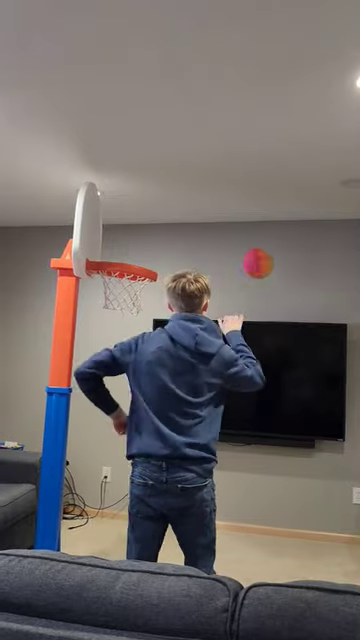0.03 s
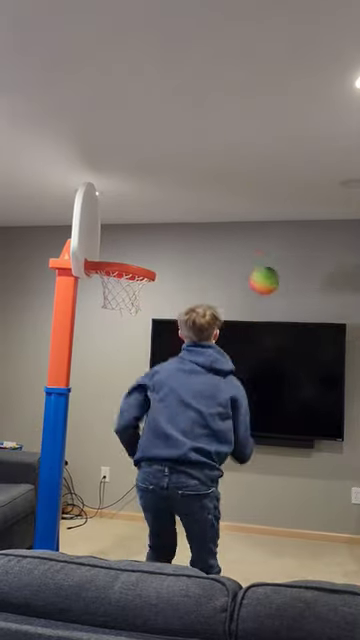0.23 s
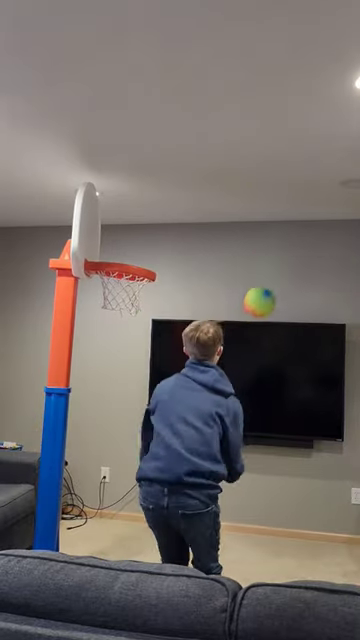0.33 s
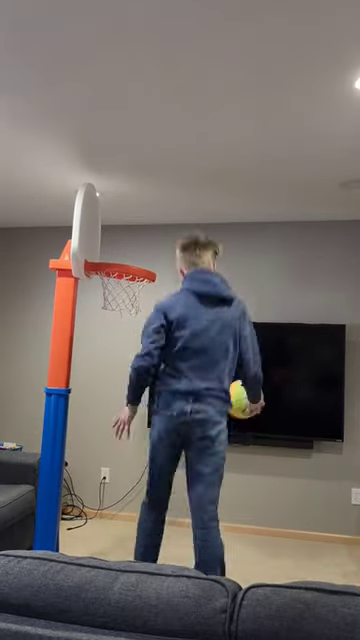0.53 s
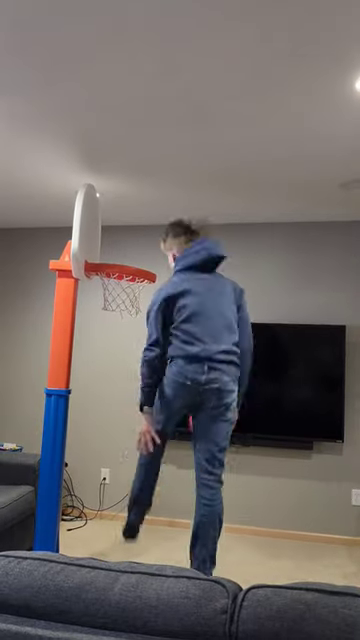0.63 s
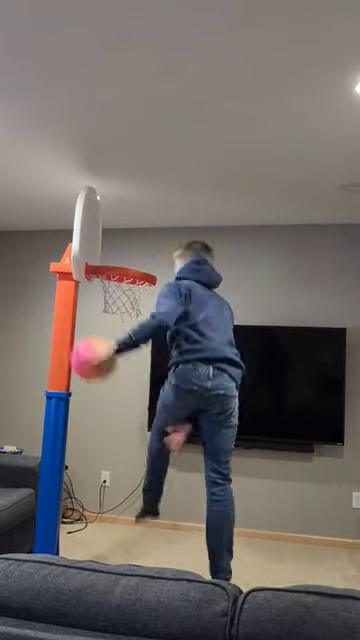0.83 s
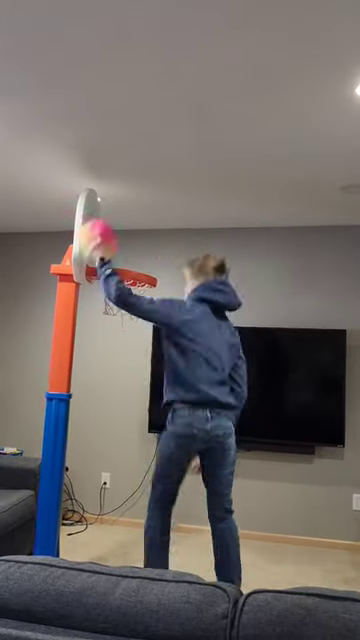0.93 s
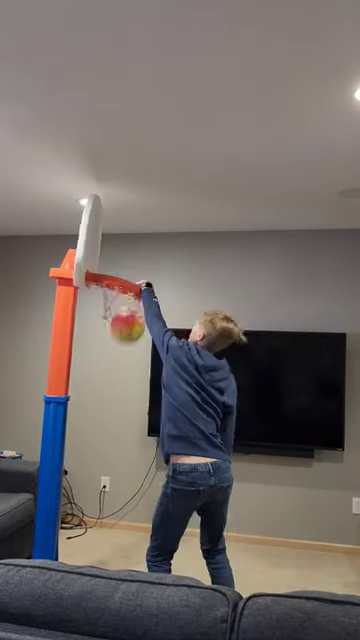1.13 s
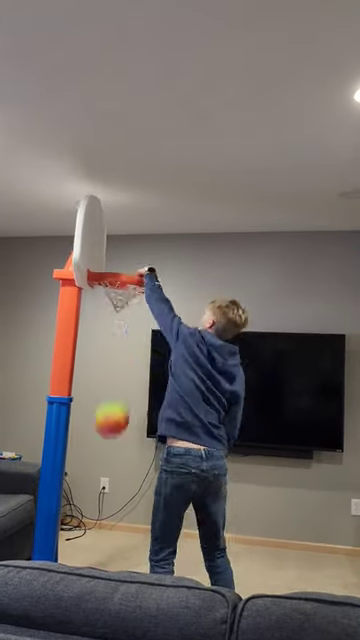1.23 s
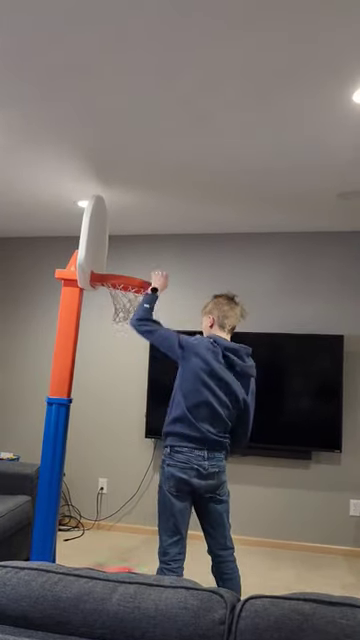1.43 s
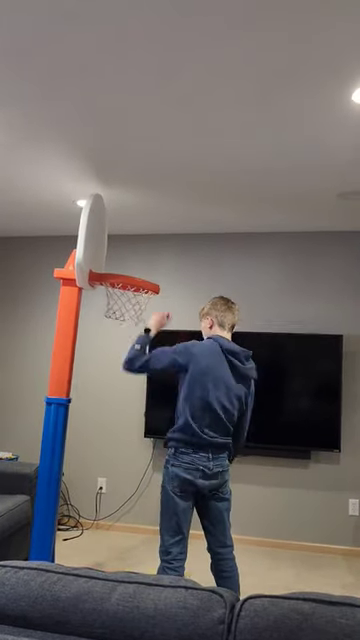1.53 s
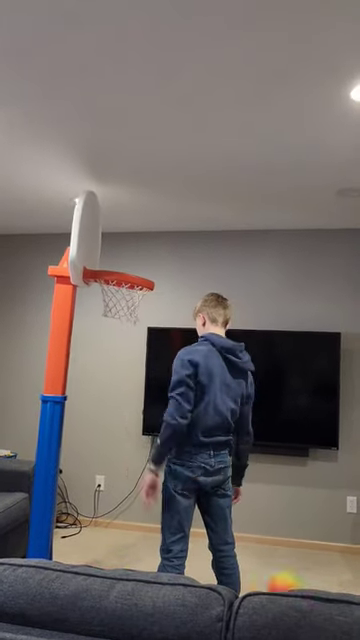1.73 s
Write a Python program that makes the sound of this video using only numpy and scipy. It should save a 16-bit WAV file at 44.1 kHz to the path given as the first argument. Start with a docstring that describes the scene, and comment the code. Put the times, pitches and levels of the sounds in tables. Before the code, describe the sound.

A rubber ball slaps a wall sharply at 0.2 seconds, over a small room's low hum. Soft footfalls follow, with a patting catch near 0.6, light hand taps near 0.8 and a faint clothing swish at 0.9. Feet thud at 1.0, then a dunk knocks a plastic toy hoop around 1.15. The rim clacks back at 1.4 and the ball immediately thumps onto carpet, echoing briefly.

```python
"""Over the low hum of a small carpeted room, a rubber ball slaps the wall. Feet thud softly, the player
catches the ball and, with a swish of clothes, passes it under a leg from hand to hand. After two more
footfalls the ball is dunked through a plastic toy hoop. The bent rim snaps back and the ball drops on
the carpet. Each hit is a short push followed by the room's echoes, while the things that were struck
ring on in a few fading tones."""
import sys
import numpy as np
from scipy import signal
from scipy.fft import rfft, irfft
from scipy.io import wavfile
from scipy.ndimage import uniform_filter1d

SR = 44100
rng = np.random.default_rng(int(sys.argv[2]) if len(sys.argv) > 2 else 0)


def dump_mix(stems):
    """Bounce the given channels to the path in sys.argv[1] as a 16-bit WAV at rate SR."""
    frames = np.atleast_2d(stems).T  # one column per channel
    limited = np.clip(frames, -1, 1)  # hard clip at full scale
    pcm = np.round(limited * 32767).astype(np.int16)
    wavfile.write(sys.argv[1], SR, pcm)


N = 79380  # 1.8 s

# The hits, one a row. More tilt sounds brighter; more hardness gives a cleaner click.
# (time [s], push level [dB], tilt [dB per octave], contact time [s], hardness [0-1],
#  ring level [dB], ring pitch [ratio])
BALL_ON_WALL = [(.2026, -20, 0.5, 0.00046, 0.6, -16.5, 1)]
FEET_ON_CARPET = [(.32, -51.5, -2, .005, .2, -31.5, 0.9), (.44, -54, -7, .005, .2, -37, 0.9),
                  (1.02, -44, -5, 0.0028, .1, -56, 0.55), (1.044, -37.5, -1.5, .003, .05, -27, 0.99)]
CATCH_HITS = [(.5555, -39.5, -0.5, 0.0016, .1, -27, 0.98), (.5655, -35, 1.5, 0.002, 0.39, -28, 0.96)]
PASS_HITS = [(.756, -38, -0.37, 0.0018, 0.79, -29, 0.93), (.763, -41, 2.86, 0.0024, 0.45, -50, 0.88),
             (.778, -37, -0.92, 0.0012, .6, -26, 0.98)]
DUNK_HITS = [(1.1395, -30, 1, 0.0042, .4, -38, 0.94), (1.1513, -25.5, 0, 0.0041, 0.071, -32.5, 1),
             (1.166, -32.5, -5.5, 0.005, 0, -22, 1), (1.2365, -30, -0.57, 0.0049, 0, -26, 1)]
SNAP_HITS = [(1.4357, -27.5, 0, .0006, 1, -36.5, 1), (1.439, -27.5, 0.53, 0.0019, 0.39, -26.5, 1)]
BALL_ON_CARPET = [(1.4615, -28.5, 1, 0.0014, 0.78, -21, 0.93), (1.4765, -27, -0.59, .0015, 0.45, -21, 0.99)]

# The colour of each sound: how its strength is shared from bass to treble.
# (frequency [Hz], relative level [dB])
HUM_COLOUR = [(20, -30), (45, 0), (80, 0), (130, -12), (200, -20), (350, -25), (700, -38), (2000, -41),
              (6000, -47), (15000, -54)]
SLAP_COLOUR = [(25, -15), (50, 3.5), (80, -18.5), (120, -6), (230, -10.5), (320, -8), (550, -10),
               (870, -8.5), (1150, -12), (2100, -21.5), (3200, -24), (5000, -23.5), (7900, -29),
               (10000, -34.5), (15500, -37)]
FOOT_COLOUR = [(25, -24), (70, -7), (140, -6), (250, -8), (540, -25), (800, -20), (1500, -28.5),
               (2200, -31), (4500, -35.5), (8400, -36), (15500, -41)]
PALM_COLOUR = [(40, -26.5), (150, -6.5), (200, -11), (290, -4.5), (400, -8), (630, -22), (1000, -23.5),
               (1550, -25), (3100, -36.5), (6300, -41), (15500, -52.5)]
CLOTH_COLOUR = [(200, -20), (1000, -17), (2500, 4), (5000, 7), (9000, 2), (15000, 0)]
DUNK_COLOUR = [(30, -29), (80, -14), (170, -13), (240, -16.5), (340, -5), (480, -21), (800, -22.5),
               (1550, -26.5), (2500, -30.5), (3300, -37.5), (4200, -34.5), (8300, -42.5), (15500, -56)]
RIM_SNAP_COLOUR = [(40, 1), (325, -3), (640, -13), (820, -7.5), (1000, -18), (1400, -13.5), (2500, -14.5),
                   (3500, -19), (5000, -12.5), (8000, -18), (13700, -21), (15500, -33)]
DROP_COLOUR = [(25, -13.5), (45, -12), (75, -29), (120, 0.5), (215, -10), (322, -1.5), (470, -11),
               (680, -18.5), (790, -19), (1000, -19), (2500, -31), (6000, -36), (15500, -48)]

# The tones that ring on after a hit. A fade time is how long a sound takes to fall by 60 dB.
# (frequency [Hz], relative level [dB], fade time [s])
WALL_TONES = [(47, -13, 0.1), (117.4, 1.5, 0.17), (162, -7.5, 0.32), (292, 5, 0.077), (341.4, 2.5, 0.23),
              (503, -3, .3), (654, -8, 0.11), (863, -8.5, 0.24), (886, -13, 0.46), (913, -1.5, .22),
              (954, -8, 0.23), (1053, -10.5, .14), (1244, -10, 0.084), (1349, -6.5, 0.28),
              (2590, -19.5, 0.3), (3380, -17, 0.28)]
FOOT_TONES = [(54.5, 4.5, 0.2), (83.6, 6.5, 0.14), (145, -9, 0.098), (246, -8, 0.064)]
CATCH_TONES = [(55.6, -2.5, 0.39), (151, -10.5, 0.51), (272.7, 1, 0.19), (380, -10.5, 0.27),
               (563, -27, 0.22)]
PASS_TONES = [(79, -5, 0.23), (158, -6, 0.15), (257.6, -13.5, 0.36), (314, 1.5, 0.27), (377, 2, 0.27),
              (490, -11, 0.25)]
HOOP_TONES = [(92.8, -7, .22), (128, -9, 0.42), (167.2, 0, 0.18), (276.3, -6.5, 0.43), (338.7, 4, 0.27),
              (380, -14, .27), (465, -13, .45), (1270, -25.5, 0.46), (2260, -12.5, 0.052)]
DROP_TONES = [(41.2, -3, 0.46), (118.7, -3, 0.076), (196.6, -4, 0.14), (327, -1.5, 0.19), (470.4, -6, 0.28),
              (561, -8, 0.17), (813, -13, 0.28)]

# Movements of the clothes (time of peak [s], width [s], level [dB])
CLOTH_SWISHES = [(.69, 0.026, -76), (0.902, 0.031, -57.5), (1.03, 0.028, -67.5)]

# The first echoes of a hit on the wall, and of one in the play area (delay [s], level [dB])
ECHOES_FROM_WALL = [(.0012, -21), (.0082, -11.5), (.0112, -22.5), (0.016, -12), (0.0184, -15), (0.029, -15)]
PLAY_ECHOES = [(.002, -24.5), (.0055, -13.5), (.0085, -10), (0.027, -27)]
# The quick scatter of early echoes, compared with the room's long tail (frequency [Hz], level [dB])
SCATTER_LEVELS = [(40, 10), (300, 4.5), (900, -0.5), (1900, 6.5), (4000, 7.5), (8000, 5), (15000, -3)]
# How long that tail lasts (frequency [Hz], fade time [s])
TAIL_FADES = [(40, 0.43), (120, 0.73), (300, 0.44), (700, 0.4), (1800, 0.49), (4500, 0.47), (8000, 0.36),
              (15000, 0.21)]
# How alike the left and right microphones sound (frequency [Hz], likeness [0-1])
STEREO_LIKENESS = [(40, 0.92), (150, 0.97), (350, 0.89), (650, 0.47), (1100, 0.48), (2000, 0.24),
                   (5000, 0.19), (15000, 0.013)]

SCATTER_FADE_S, ECHO_SMEAR_S = 0.097, 0.00024  # furniture and corners smear each echo
DIRECT_BASE_DB, MIC_LAG_S = -15, 0.0003  # the direct sound reaches the right microphone later
RING_RISE_CYCLES = 1.23
LEVEL_SPAN_S = 0.1  # a push holds the energy of a steady sound this long


def amp(db):
    """Turns decibels into a number to multiply a sound by."""
    return 10 ** (np.asarray(db) / 20)


def unit(x):
    """Scales a sound to an average (rms) strength of one."""
    return x / np.sqrt(np.mean(x ** 2) + 1e-20)


def look_up(table, hz):
    """Reads between the rows of a table, with octaves evenly spaced."""
    row_hz, values = np.transpose(table)
    return np.interp(np.log(hz + 1), np.log(row_hz), values)


def add(mix, start_s, sound):
    """Mixes a stereo sound in at the given time."""
    part = mix[:, round(start_s * SR):][:, :sound.shape[1]]
    part += sound[:, :part.shape[1]]


def stereo_noise(size, colour=None):
    """Noise at two microphones, alike in the bass and unrelated in the treble."""
    hz = np.fft.rfftfreq(size, 1 / SR)
    shared, opposite = rfft(rng.standard_normal((2, size)))
    likeness = np.clip(look_up(STEREO_LIKENESS, hz), -.99, .99)
    shared = shared * np.sqrt((1 + likeness) / 2)
    opposite = opposite * np.sqrt((1 - likeness) / 2)
    gain = amp(look_up(colour, hz)) if colour else 1
    return irfft(np.array([shared + opposite, shared - opposite]) * gain, size)


def shortest_pulse(gain):
    """The tightest pulse with this strength at each frequency and no sound before its start."""
    log_gain = np.log(np.maximum(gain, gain.max() * 1e-5))
    mirrored = np.concatenate([log_gain, log_gain[-2:0:-1]])
    return np.fft.ifft(np.exp(np.conj(signal.hilbert(mirrored)))).real


def room_path(echoes, direct_db, scatter_db, size=32768):
    """How a click reaches the microphones: directly, then as echoes, quick scatter and a long tail."""
    hz, t, noise = signal.stft(stereo_noise(size), SR, nperseg=256)
    tail = amp(-60 * t / look_up(TAIL_FADES, hz)[:, None])
    scatter = amp(scatter_db + look_up(SCATTER_LEVELS, hz)[:, None] - 60 * t / SCATTER_FADE_S)
    _, fading = signal.istft(noise * np.hypot(tail, scatter), SR, nperseg=256)
    path = unit(fading[:, :size]) / np.sqrt(size)
    path[[0, 1], [0, round(MIC_LAG_S * SR)]] += amp(DIRECT_BASE_DB + direct_db)
    for delay_s, db in echoes:
        burst = stereo_noise(256) * np.exp(-np.arange(256) / SR / ECHO_SMEAR_S)
        add(path, delay_s, amp(db) * burst / np.linalg.norm(burst, axis=1, keepdims=True))
    return path


def push(colour, tilt_db, contact_s, hardness, path):
    """A hard click and a swell of tiny touches, heard through the room and coloured by what was hit."""
    size = path.shape[1]
    t, hz = np.arange(size // 8) / SR, np.fft.rfftfreq(size, 1 / SR)
    contact = rng.standard_normal(len(t)) ** 3 * t * np.exp(-t / contact_s)  # cubed noise is spiky
    contact *= np.sqrt(1 - hardness ** 2) / np.linalg.norm(contact)
    contact[0] += hardness  # the click
    sound = signal.fftconvolve(path, contact[None], axes=1)[:, :size]
    # Swap the sound's broad colour for that of the struck thing; the room's fine detail stays.
    power = (abs(rfft(sound)) ** 2).mean(0)
    broad_colour = np.sqrt(uniform_filter1d(power, size=70))
    octaves = np.log2(np.maximum(hz, 300) / 1000)
    wanted_colour = amp(look_up(colour, hz) + tilt_db * octaves)
    pulse = shortest_pulse(wanted_colour / broad_colour)[:size // 8]
    sound = signal.fftconvolve(sound, pulse[None], axes=1)[:, :size]
    return unit(sound) * np.sqrt(LEVEL_SPAN_S * SR / size)


def ring(tones, pitch, size=32768):
    """Tones that build up quickly and fade; the higher ones reach the microphones out of step."""
    t, out = np.arange(size) / SR, np.zeros((2, size))
    for hz, db, fade_s in tones:
        shift = np.arccos(look_up(STEREO_LIKENESS, hz)) * rng.choice([-.5, .5])
        wave = np.sin(2 * np.pi * hz * pitch * t + np.array([[shift], [-shift]]))
        rise = 1 - np.exp(-t * hz / RING_RISE_CYCLES)
        out += rise * amp(db - 60 * t / fade_s) * wave
    return out


def strikes(hits, colour, tones, direct_db, scatter_db, left_db, echoes=PLAY_ECHOES):
    """Plays each hit as a push plus a ring; left_db makes the left side louder than the right."""
    out = np.zeros((2, N))
    for start_s, push_db, tilt_db, contact_s, hardness, ring_db, pitch in hits:
        path = room_path(echoes, direct_db, scatter_db)
        knock = push(colour, tilt_db, contact_s, hardness, path)
        add(out, start_s, amp(push_db) * knock + amp(ring_db) * ring(tones, pitch))
    return out * amp([[left_db / 2], [-left_db / 2]])


def room_hum(level_db=-49):
    """Steady, deep noise that fills the room."""
    return amp(level_db) * unit(stereo_noise(N, HUM_COLOUR))


def wall_slap():
    """The rubber ball hits the wall very briefly, and both ring."""
    return strikes(BALL_ON_WALL, SLAP_COLOUR, WALL_TONES, direct_db=-10, scatter_db=-3.5, left_db=1,
                   echoes=ECHOES_FROM_WALL)


def footsteps():
    """Feet land on soft carpet with low, dull thuds."""
    return strikes(FEET_ON_CARPET, FOOT_COLOUR, FOOT_TONES, direct_db=-0.5, scatter_db=-1.5, left_db=0.3)


def catch():
    """The hands close on the ball with two quick pats that set it ringing."""
    return strikes(CATCH_HITS, PALM_COLOUR, CATCH_TONES, direct_db=2, scatter_db=3.5, left_db=0.4)


def clothes_swish():
    """Moving cloth makes a faint hiss that swells and dies away."""
    t = np.arange(N) / SR
    motion = sum(amp(db) * np.exp(-((t - peak_s) / width_s) ** 2 / 2)
                 for peak_s, width_s, db in CLOTH_SWISHES)
    return motion * unit(stereo_noise(N, CLOTH_COLOUR))


def hand_pass():
    """The ball goes from palm to palm with three light taps."""
    return strikes(PASS_HITS, PALM_COLOUR, PASS_TONES, direct_db=3, scatter_db=2.5, left_db=0.3)


def dunk():
    """Ball and hand knock the plastic rim down, and the hoop rings."""
    return strikes(DUNK_HITS, DUNK_COLOUR, HOOP_TONES, direct_db=-5, scatter_db=-1.5, left_db=0.7)


def rim_snap():
    """The bent rim springs back against its stop with a bright clack."""
    return strikes(SNAP_HITS, RIM_SNAP_COLOUR, HOOP_TONES, direct_db=0.5, scatter_db=6.5, left_db=1.5)


def ball_drop():
    """The ball thumps onto the carpet and rings."""
    return strikes(BALL_ON_CARPET, DROP_COLOUR, DROP_TONES, direct_db=-10, scatter_db=6.5, left_db=-0.2)


def scene():
    """Adds up all the sounds, in the order they are first heard."""
    return (room_hum() + wall_slap() + footsteps() + catch() + clothes_swish() + hand_pass()
            + dunk() + rim_snap() + ball_drop())


def record(dry, lowest_hz=30, highest_hz=15700):
    """Trims away the deepest rumble and the highest treble."""
    bass_cut = signal.butter(3, lowest_hz, "highpass", fs=SR, output="sos")
    treble_cut = signal.firwin(301, highest_hz, window=("kaiser", 9), fs=SR)
    return signal.oaconvolve(signal.sosfilt(bass_cut, dry), treble_cut[None], "same")


dry = scene()
out = record(dry)
dump_mix(out)
```